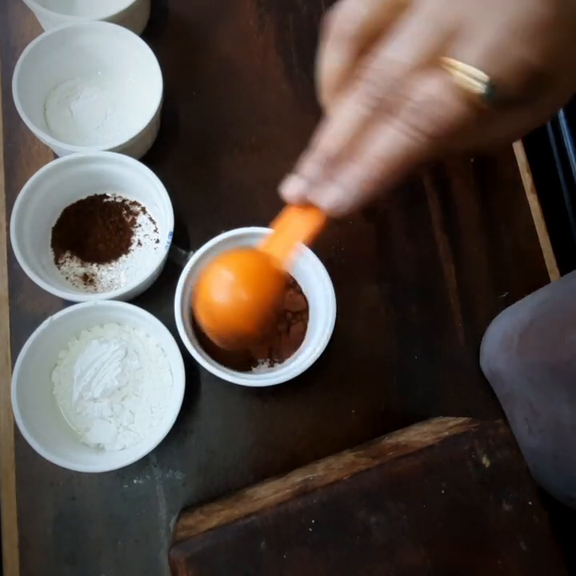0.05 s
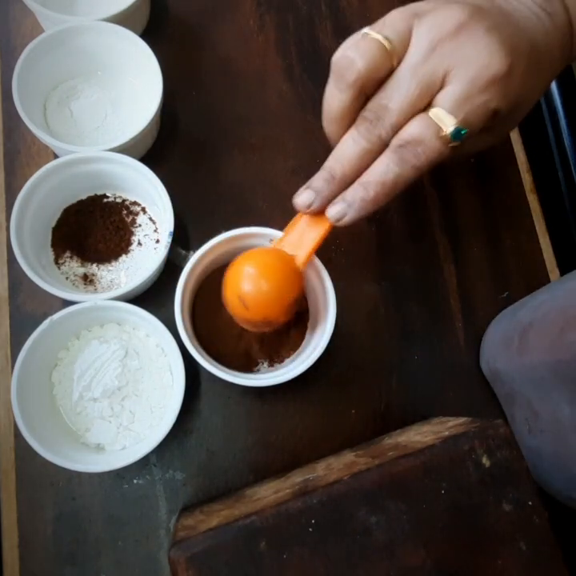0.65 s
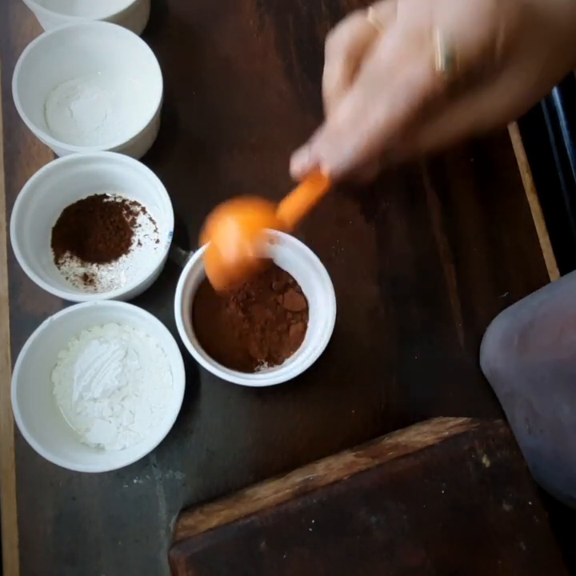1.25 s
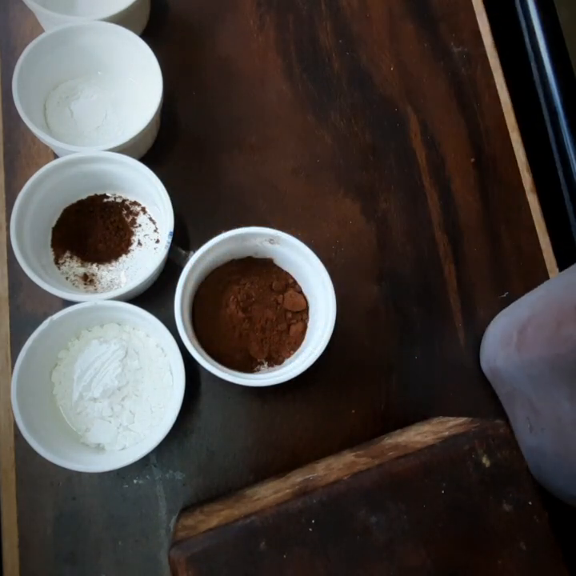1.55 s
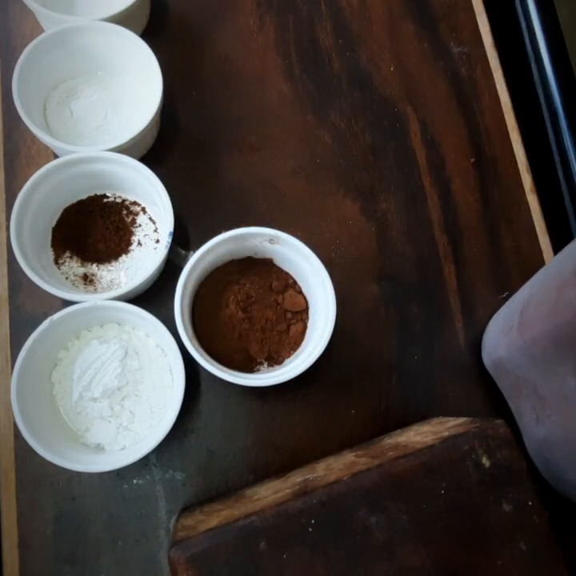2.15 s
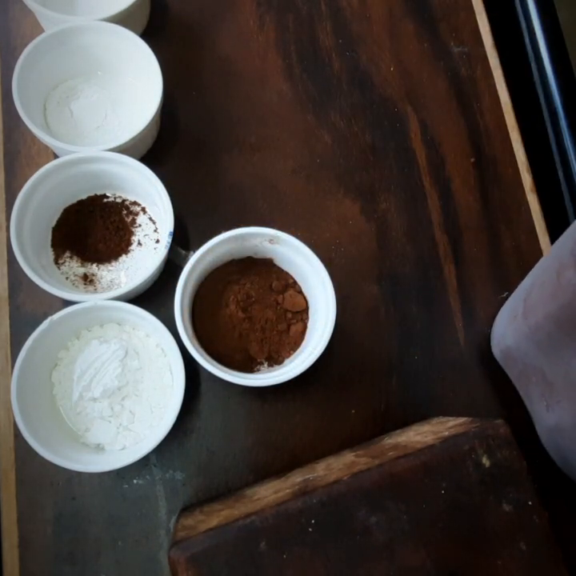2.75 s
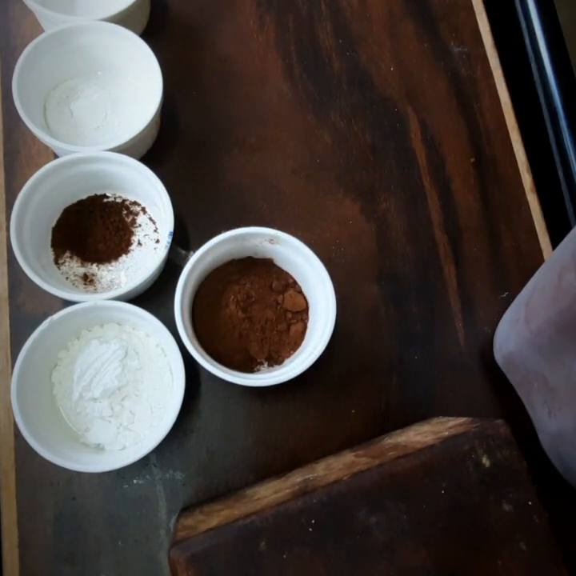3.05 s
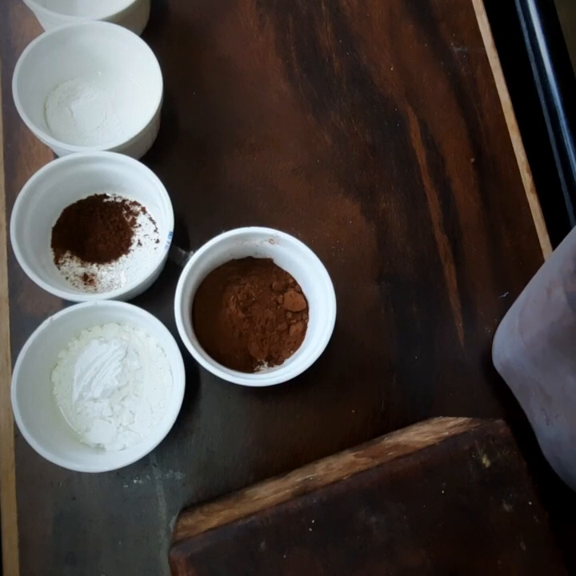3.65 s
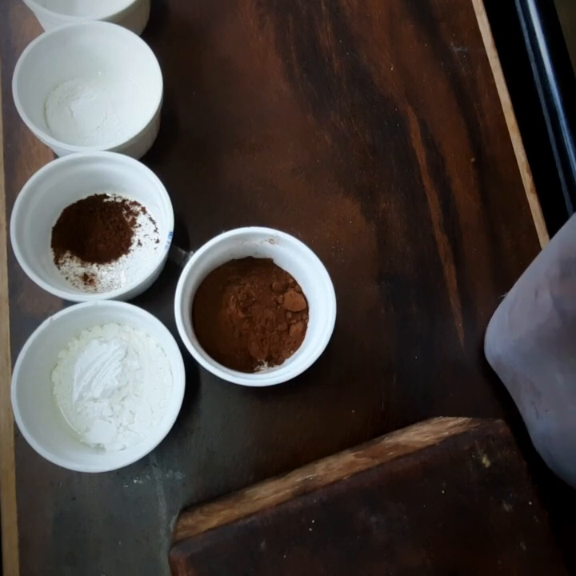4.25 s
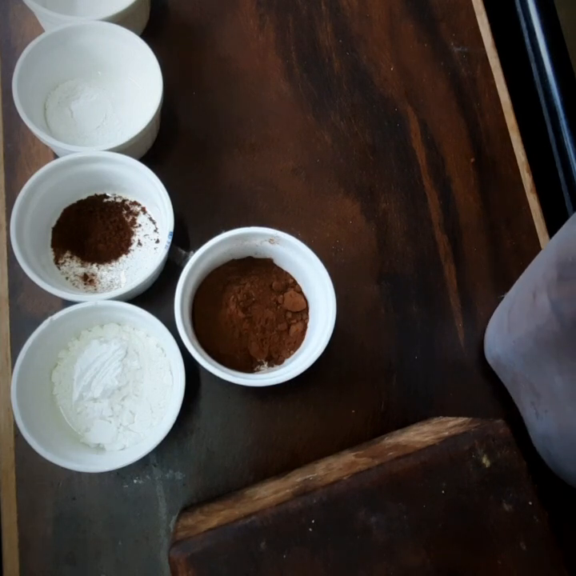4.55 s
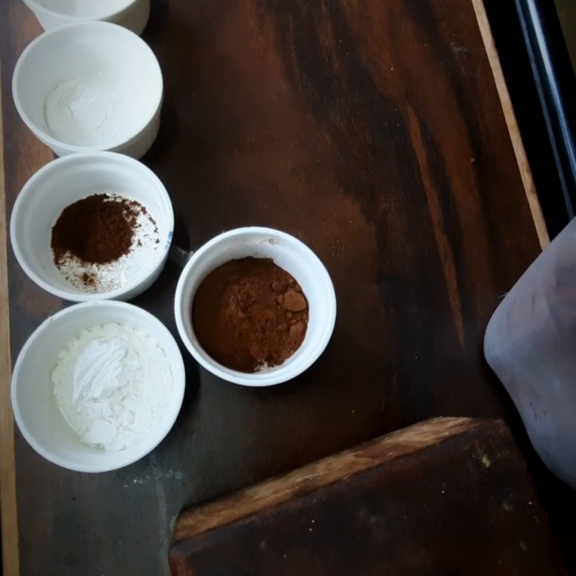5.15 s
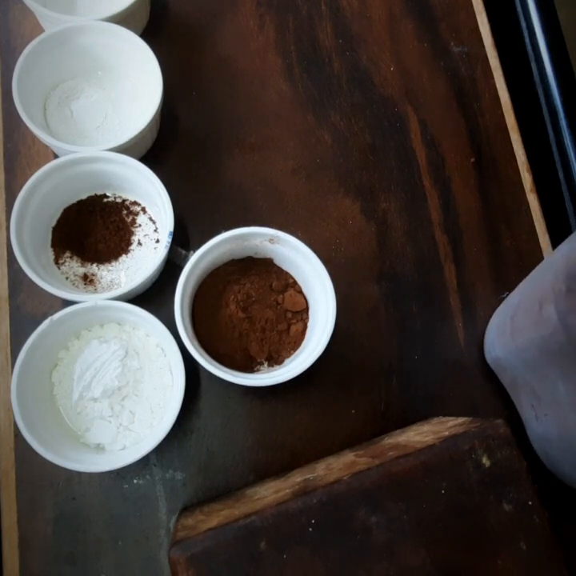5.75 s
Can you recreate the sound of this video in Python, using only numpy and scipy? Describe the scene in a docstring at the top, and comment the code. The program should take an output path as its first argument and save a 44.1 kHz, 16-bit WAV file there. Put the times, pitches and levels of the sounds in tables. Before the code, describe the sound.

A plastic spoon knocks on a small ceramic bowl, scrapes and crackles through powder, then thuds dully against its container three times.

```python
"""A low rumble runs throughout, and a small kitchen answers each sound. After one faint thud, a plastic
measuring spoon is knocked five times on the rim of a small ceramic bowl to empty it (0.5-1.2 s).
From 1.8 s, off to the right, it bumps a container of powder and digs in, scraping and crackling.
Around 5 s three strong, dull thuds on the container follow, then a few light ticks."""
import sys
import numpy as np
from scipy import signal
from scipy.fft import rfft, irfft, next_fast_len
from scipy.io import wavfile
from scipy.ndimage import uniform_filter1d, minimum_filter1d

SR = 44100
rng = np.random.default_rng(int(sys.argv[2]) if len(sys.argv) > 2 else 0)


def inscribe(sig):
    """Save sig as 16-bit PCM at rate SR to the path in sys.argv[1].

    A 1-D sig is mono; a 2-D sig holds one channel per row.
    Samples are clipped to [-1, 1] before scaling.
    """
    pcm = np.round(np.clip(np.atleast_2d(sig).T, -1, 1) * 32767)
    wavfile.write(sys.argv[1], SR, pcm.astype(np.int16))


N = 255329
TIME_S = np.arange(N) / SR
HIT_S = TIME_S[:SR // 2]  # time axis of one impact


def undb(db):
    """Decibels to gain."""
    return 10 ** (np.asarray(db) / 20)


def unit_rms(x):
    """Scale to an rms of one."""
    return x / np.sqrt(np.mean(x ** 2))


def on_log_axis(hz, points):
    """Interpolate (Hz, value) points over log frequency."""
    point_hz, value = np.transpose(points)
    return np.interp(np.log(np.maximum(hz, 1)), np.log(point_hz), value)


def colour(x, points):
    """Filter by a curve of (Hz, dB) points."""
    n = x.shape[-1]
    size = next_fast_len(n + SR // 10)
    gain = undb(on_log_axis(np.fft.rfftfreq(size, 1 / SR), points))
    return irfft(rfft(x, size) * gain, size)[..., :n]


def butter(x, hz, kind, order=2):
    """Butterworth low-, high- or band-pass."""
    sos = signal.butter(order, np.minimum(hz, SR / 2 - 1000), kind, fs=SR, output="sos")
    return signal.sosfilt(sos, x)


def noise_band(samples, hz, width_hz):
    """Unit-rms noise around one pitch."""
    return unit_rms(butter(rng.standard_normal(samples), [hz - width_hz / 2, hz + width_hz / 2], "band"))


def decay(t60_s):
    """Envelope falling 60 dB in t60_s."""
    return np.exp(-np.log(1000) * HIT_S / t60_s)


def ring(modes):
    """Decaying sines of a struck object."""
    return sum(undb(db) * np.sin(2 * np.pi * hz * HIT_S) * decay(t60_s) for hz, db, t60_s in modes)


def burst(t60_s):
    """A short crack of noise."""
    return rng.standard_normal(len(HIT_S)) * decay(t60_s)


def click(t60_s, rough):
    """A contact spike with a little crunch."""
    return signal.unit_impulse(len(HIT_S), 8) + rough * burst(t60_s)


def add(track, start_s, sound):
    """Mix a sound into a track."""
    i = int(start_s * SR)
    track[..., i:i + sound.shape[-1]] += sound[..., :N - i]


def pan(pair, pan_db):
    """Tilt a stereo pair; positive is left."""
    return pair * undb(np.array([[pan_db], [-pan_db]]) / 2)


def place(x, pan_db, lag_samples=0):
    """Direct sound in stereo; a positive lag delays the left, a negative one the right."""
    return pan(np.array([np.roll(x, max(lag_samples, 0)), np.roll(x, max(-lag_samples, 0))]), pan_db)


# Background spectrum. Each row: frequency in Hz, relative density in dB.
RUMBLE_COLOUR = [(15, -51), (25, -32), (49, -11), (82, -12), (110, -8), (148, -1), (215, -14), (331, -9.5),
                 (368, -17.5), (457, -22), (598, -27.5), (648, -28.5), (703, -30.5), (5880, -43),
                 (15500, -41)]
# Its slow swell. Each row: time in seconds, gain in dB.
RUMBLE_SWELL = [(.4, -60.5), (1.3, -57.5), (4.4, -59), (5.2, -56), (5.79, -62)]


def rumble(hum_hz=128, hum_width_hz=30, hum_db=-5, pan_db=2):
    """Low noise and a droning room resonance, with a faint wide hiss."""
    mid, side = (unit_rms(colour(rng.standard_normal(N), RUMBLE_COLOUR)) for _ in range(2))
    side = colour(side, [(40, -2), (130, -14), (300, -8), (700, -0.5), (2000, 0.5)])
    hum = undb(hum_db) * noise_band(N, hum_hz, hum_width_hz)
    air = place(mid + hum, pan_db) + np.array([side, -side])
    return air * undb(np.interp(TIME_S, *np.transpose(RUMBLE_SWELL)))


# Bumps on the container. Each row: start in seconds, level in dB, low-pass in Hz, tick offset in dB.
BUMPS = [(0.154, -28.5, 1480, 8.5), (1.8319, -5.5, 1690, -20), (2.548, -19.5, 1200, -11),
         (2.582, -17.5, 1210, -13), (2.603, -17, 1000, -2), (2.9455, -18, 1200, -3),
         (3.125, -19, 1000, -16), (3.854, -21, 893, 2.5), (4.862, -1.5, 1230, 2.5),
         (5.0593, -7.5, 1220, 5.5), (5.258, -0.5, 1170, 5), (5.3713, -28, 1520, 24), (5.441, -24, 1200, 8),
         (5.5481, -32.5, 2016, 26.5)]
# Container walls. Each row: frequency in Hz, level in dB, t60 in seconds.
CONTAINER_MODES = [(345, -32.5, 0.078), (443, -35, 0.015), (582, -31.5, 0.063), (685, -20.5, 0.028),
                   (747, -20.5, 0.034), (830, -39, 0.032), (1696, -18, 0.0052), (2030, -52, 0.031)]
# Table top beneath. Each row: frequency in Hz, level in dB, t60 in seconds.
TABLE_MODES = [(103.6, -46, 0.4)]
# Crunch opening each thud. Each row: frequency in Hz, gain in dB.
CRUNCH_COLOUR = [(900, 6.5), (1700, 6.5), (2700, 7), (3200, -5), (4000, 6.5), (7000, -1), (8500, -1),
                 (10000, -15.5), (12500, -7.5), (15500, -22)]


def container_thuds(tick_db=-22, highpass_hz=250, pan_db=-8, room_db=-3.5):
    """Dull blows on the powder-filled container start with a crunch and shake the table."""
    thuds = np.zeros(N)
    for start_s, db, lowpass_hz, sharp_db in BUMPS:
        walls = butter(ring(CONTAINER_MODES), lowpass_hz, "low", order=1)
        walls = butter(walls, highpass_hz, "high", order=3)
        tick = undb(tick_db + sharp_db) * colour(click(t60_s=0.015, rough=0.23), CRUNCH_COLOUR)
        add(thuds, start_s, undb(db) * (walls + ring(TABLE_MODES) + tick))
    return place(thuds, pan_db, lag_samples=14) + undb(room_db) * kitchen_echo(thuds)


# Room decay. Each row: frequency in Hz, t60 in seconds.
ECHO_T60 = [(150, .45), (400, .42), (800, .38), (2000, .42), (5000, .38), (15000, .29)]
# Echo spectrum. Each row: frequency in Hz, gain in dB.
ECHO_COLOUR = [(100, -6), (330, 6), (700, 0), (1300, 2.5), (1750, 1.5), (2400, 0.5), (3500, 0), (8000, 2.5),
               (15000, 6.5)]


def kitchen_echo(x, early_boost=0.23, early_s=0.03, gap_s=0.0017):
    """Close reflections from table and walls, then a diffuse tail, different on each side."""
    spectrum = rfft(rng.standard_normal((2, len(HIT_S))))
    hz = np.fft.rfftfreq(len(HIT_S), 1 / SR)
    onset = np.clip(HIT_S / gap_s - 1, 0, 1) * (1 + early_boost * np.exp(-HIT_S / early_s))
    end_fade = np.minimum(1, 4 * (1 - HIT_S / HIT_S[-1]))
    edges_hz = np.geomspace(60, 16000, 25)
    response = 0
    for low_hz, high_hz in zip(edges_hz, edges_hz[1:]):
        centre_hz = np.sqrt(low_hz * high_hz)
        band = irfft(spectrum * (hz >= low_hz) * (hz < high_hz), len(HIT_S))
        band *= onset * end_fade * decay(on_log_axis(centre_hz, ECHO_T60))
        # energy in proportion to bandwidth
        band *= np.sqrt(2 * (high_hz - low_hz) / SR / np.sum(band ** 2, axis=1, keepdims=True))
        response += band * undb(on_log_axis(centre_hz, ECHO_COLOUR))
    return signal.fftconvolve(x[None], response, axes=1)[:, :N]


def detune(modes, spread=.012):
    """The spoon meets the rim differently each time, which shifts the mode frequencies."""
    return np.array(modes) * (1 + np.outer(rng.standard_normal(len(modes)), [spread, 0, 0]))


# Spoon on rim. Each row: start in seconds, level in dB, low-pass in Hz, cup share in dB, sharpness in dB.
RIM_KNOCKS = [(0.5322, -10.5, 2960, 1.5, 0), (.6656, -6.5, 3000, -1, 2.5), (0.8632, -20.5, 2830, -9, -14.5),
              (1.0060, 0, 3418, -1, -7.5), (1.1977, -3.5, 3030, 6.5, 5)]
# Modes of a knock. Each row: frequency in Hz, level in dB, t60 in seconds.
CUP_MODES = [(784, -22.5, 0.036), (900, -23.5, 0.015), (1066, -17, 0.015)]  # the spoon's hollow cup
CLACK_MODES = [(1671, -8.5, 0.024), (1862, -15.5, 0.046), (2033, -18.5, 0.02), (2234, -10, 0.0086),
               (2609, -7, 0.017), (2786, -24, 0.041)]  # spoon and rim together
FOOT_MODES = [(338, -46, 0.36), (430, -42.5, 0.067)]  # the bowl's foot on the table
BOWL_MODES = [(1614, -6, .2), (1655, -7, .26), (1722, -8, .2), (1766, -9, .32), (1829, -7, .22),
              (1943, -8, .2), (2225, -12, .16), (2589, -7, .2), (2638, -1, .42)]  # the bowl, damped by powder
SHIMMER_MODES = [(6083, -45, .3), (6150, -46, .22), (10545, -44, .08), (10560, -41, .17)]  # its high modes, stronger on sharp contact
# Contact tick. Each row: frequency in Hz, gain in dB.
TICK_COLOUR = [(1500, -14.5), (3000, -7.5), (4200, 2), (5500, -0.5), (7000, -3.5), (9000, -8), (10400, -9),
               (12000, -11), (14200, -11), (15500, -19.5)]


def bowl_knocks(tick_db=-12, ring_db=-31, shimmer_db=3, highpass_hz=650,
                bounce_s=.0034, bounce_db=-8, ring_room_db=-8, room_db=-3.5):
    """Each knock is a hard clack with a hollow note from the spoon; the bowl rings briefly."""
    clacks, ticks, tone, shimmer = np.zeros((4, N))
    for start_s, db, lowpass_hz, cup_db, sharp_db in RIM_KNOCKS:
        cup = undb(cup_db) * ring(detune(CUP_MODES))
        rim = ring(detune(CLACK_MODES))
        clack = butter(rim + cup, lowpass_hz, "low", order=3)
        clack = butter(clack, highpass_hz, "high", order=7)  # small objects radiate little bass
        add(clacks, start_s, undb(db) * (clack + ring(FOOT_MODES)))
        add(clacks, start_s + bounce_s, undb(db + bounce_db) * clack)  # off the nearest surface
        tick = colour(click(t60_s=0.025, rough=0.48), TICK_COLOUR)
        add(ticks, start_s, undb(db + tick_db + sharp_db) * tick)
        # harder contact rings the bowl more
        add(tone, start_s, undb(db + ring_db + .15 * sharp_db) * ring(BOWL_MODES))
        add(shimmer, start_s, undb(db + shimmer_db + sharp_db / 2) * ring(SHIMMER_MODES))
    direct = place(clacks + tone, pan_db=5, lag_samples=-3)
    direct += place(ticks, pan_db=-4.5, lag_samples=-3)
    direct += place(shimmer, pan_db=1.5)
    # the bowl's ring is mostly dry, so its pitches stay clear
    echo_send = clacks + ticks + undb(ring_room_db) * (tone + shimmer)
    return direct + undb(room_db) * kitchen_echo(echo_send)


# Rubs and hums. Each row: start in seconds, length in seconds, level in dB, centre in Hz, width in Hz.
RUB_SWELLS = [(1.282, 0.087, -50, 333, 60), (2.136, 0.14, -45.5, 1880, 500),
              (2.538, 0.092, -49.5, 425, 240), (2.723, .3, -60.5, 2530, 300),
              (3.115, 0.05, -52.5, 714, 258)]


def rubs(pan_db=-5, room_db=-5):
    """Short swells of noise, each on one resonance."""
    swells = np.zeros(N)
    for start_s, length_s, db, hz, width_hz in RUB_SWELLS:
        tone = noise_band(SR, hz, width_hz)
        window = np.hanning(int(length_s * SR))
        add(swells, start_s, undb(db) * window * tone[-len(window):])
    return place(swells, pan_db, lag_samples=15) + undb(room_db) * kitchen_echo(swells)


def push(peak_s, rise_s, fall_s, range_db=28.5):
    """Gain of one spoon push: up by range_db over rise_s, down as much over fall_s."""
    from_peak = np.maximum((peak_s - TIME_S) / rise_s, (TIME_S - peak_s) / fall_s)
    return undb(-range_db * from_peak)


def friction(points, slips_per_s, spread_db, hiss):
    """Tiny slips of uneven size over a smooth hiss, coloured, at unit rms."""
    slips = (rng.random(N) < slips_per_s / SR) * rng.choice([-1, 1], N)
    sizes = undb(spread_db * np.minimum(rng.exponential(size=N), 4))
    return unit_rms(colour(unit_rms(slips * sizes) + hiss * rng.standard_normal(N), points))


# Light shifts of spoon and powder. Each row: peak, rise and fall in seconds, level in dB.
LIGHT_SHIFTS = [(1.835, 0.0058, .22, -49), (2.06, 0.19, 0.073, -67), (3.568, 0.018, .05, -61.5),
                (4.18, 0.14, 0.12, -55), (4.577, .022, 0.035, -56), (5.39, 0.18, 0.32, -54),
                (5.552, 0.0075, 0.027, -59.5)]
# Digging strokes. Each row: peak, rise and fall in seconds, level in dB, grit and wall shares in dB.
DIG_STROKES = [(2.156, 0.047, 0.035, -39, -1, -4), (2.243, 0.24, 0.26, -49, 6, 4),
               (2.40, 0.36, 0.15, -51, 2, 0), (2.599, 0.38, 0.057, -48.5, 0.5, 0),
               (2.76, 0.27, 0.061, -51, -1.5, 1.5), (2.931, 0.18, 0.073, -52, 0, 5),
               (3.07, 0.45, 0.3, -54.5, -7, -5.5), (3.324, 0.66, 0.017, -60, -16, -10)]
# Friction spectra. Each row: frequency in Hz, relative level in dB.
FINE_COLOUR = [(1500, -35), (3500, -8), (6300, -1), (8000, -1.5), (10000, -9.5), (12500, -3), (15500, -9)]
GRIT_COLOUR = [(800, 3.5), (1300, -4), (2000, 8), (2500, 10.5), (3000, 5), (3600, 7), (4800, 8),
               (8000, -62)]
WALL_COLOUR = [(150, -77), (330, -8.5), (480, -22.5), (650, 3), (780, -1), (1100, -19.5), (2000, -25.5)]
SHIFT_COLOUR = [(400, 4), (700, 10), (1300, -15.5), (2600, -6), (4000, -2), (6500, -0.5), (10000, -6.5),
                (15500, -6)]


def powder_scrapes(grit_db=-1, wall_db=-1, pan_db=-8, room_db=-3):
    """The spoon shears the powder: fine grains hiss, coarse ones rasp, the container wall drones."""
    fine_gain, grit_gain, wall_gain = np.zeros((3, N))
    for peak_s, rise_s, fall_s, db, grit_share_db, wall_share_db in DIG_STROKES:
        effort = undb(db) * push(peak_s, rise_s, fall_s)
        # each stroke takes over as the last fades
        fine_gain = np.maximum(fine_gain, effort)
        grit_gain = np.maximum(grit_gain, effort * undb(grit_db + grit_share_db))
        wall_gain = np.maximum(wall_gain, effort * undb(wall_db + wall_share_db))
    shift_gain = sum(undb(db) * push(peak_s, rise_s, fall_s) for peak_s, rise_s, fall_s, db in LIGHT_SHIFTS)
    scrape = fine_gain * friction(FINE_COLOUR, slips_per_s=3300, spread_db=5.86, hiss=0.25)
    scrape += grit_gain * friction(GRIT_COLOUR, slips_per_s=900, spread_db=0.79, hiss=0.93)
    scrape += wall_gain * friction(WALL_COLOUR, slips_per_s=270, spread_db=3.8, hiss=0.37)
    scrape += shift_gain * friction(SHIFT_COLOUR, slips_per_s=700, spread_db=6, hiss=0.7)
    echo = pan(kitchen_echo(scrape), pan_db=-4.5)  # stronger on the source's side
    return place(scrape, pan_db, lag_samples=15) + undb(room_db) * echo


# Snaps while digging. Each row: start in seconds, peak level in dB, centre in Hz.
SNAPS = [(2.2281, -19, 4280), (2.2720, -21, 3380), (2.2853, -20.5, 3280), (2.31, -37, 5370),
         (2.3336, -18, 3470), (2.4067, -18.5, 3300), (2.865, -33, 4540), (2.9284, -29, 2320),
         (4.9395, -38.5, 6700)]


def crackles(t60_s=0.0045, edge_ratio=1.37, pan_db=-7, room_db=-9):
    """Single dry snaps as the spoon pushes through."""
    snaps = np.zeros(N)
    for start_s, db, hz in SNAPS:
        snap = butter(burst(t60_s), [hz / edge_ratio, hz * edge_ratio], "band", order=1)
        add(snaps, start_s, undb(db) * snap / np.abs(snap).max())
    return place(snaps, pan_db, lag_samples=14) + undb(room_db) * kitchen_echo(snaps)


def scene():
    """All sources with their echoes, in stereo."""
    return rumble() + container_thuds() + bowl_knocks() + rubs() + powder_scrapes() + crackles()


def record(dry, ceiling=.95, window_samples=100, top_hz=15600):
    """Ease the gain down around peaks above the ceiling, then cut the top."""
    gain = ceiling / np.maximum(np.abs(dry).max(axis=0), ceiling)
    gain = uniform_filter1d(minimum_filter1d(gain, window_samples), window_samples)
    return signal.sosfilt(signal.ellip(8, .2, 70, top_hz, fs=SR, output="sos"), dry * gain)


dry = scene()
out = record(dry)
inscribe(out)
```